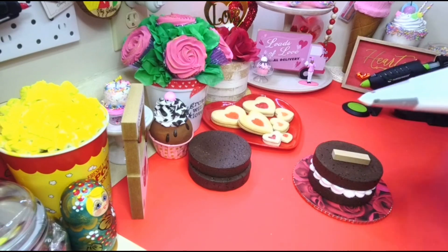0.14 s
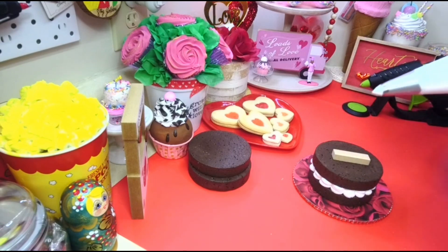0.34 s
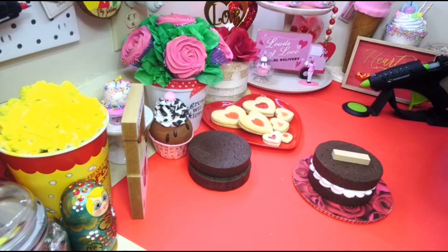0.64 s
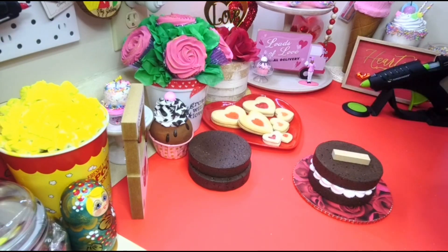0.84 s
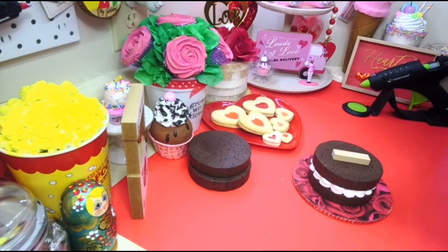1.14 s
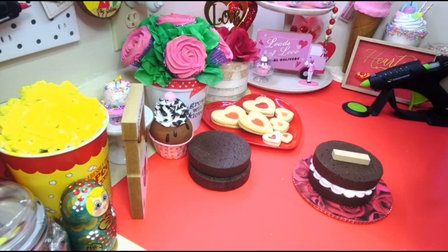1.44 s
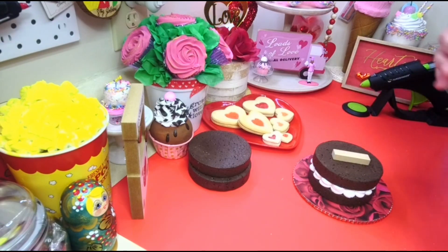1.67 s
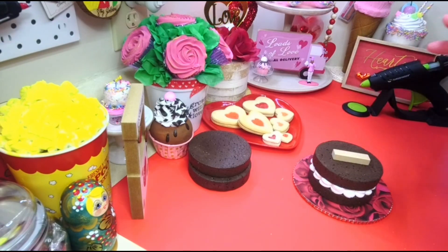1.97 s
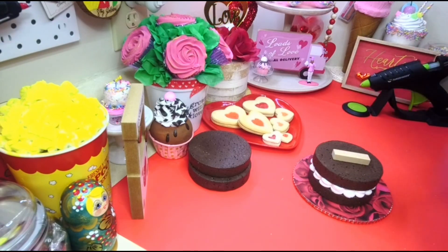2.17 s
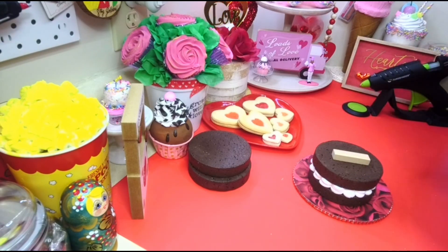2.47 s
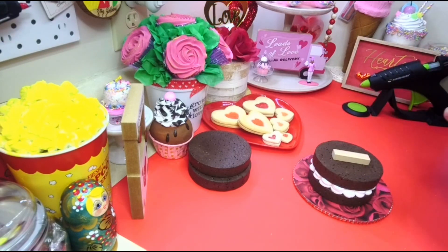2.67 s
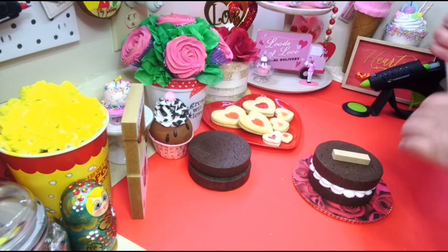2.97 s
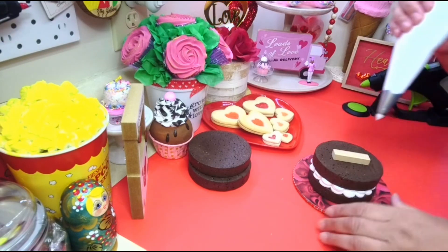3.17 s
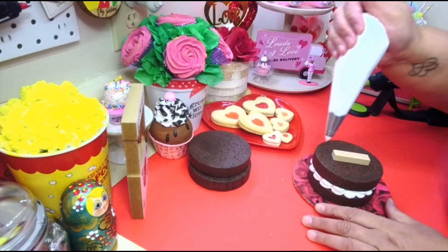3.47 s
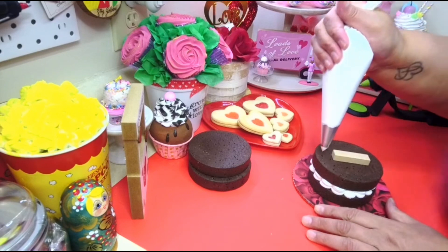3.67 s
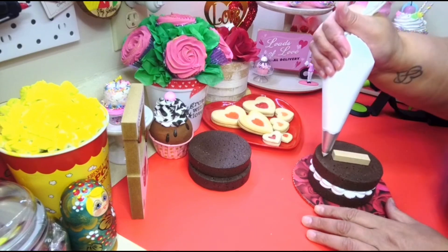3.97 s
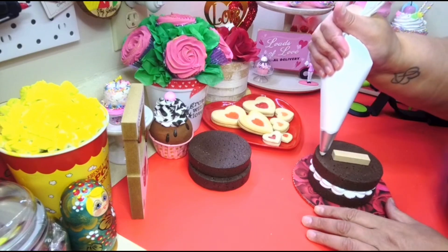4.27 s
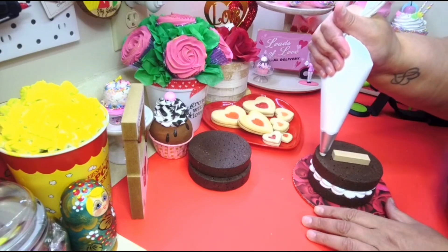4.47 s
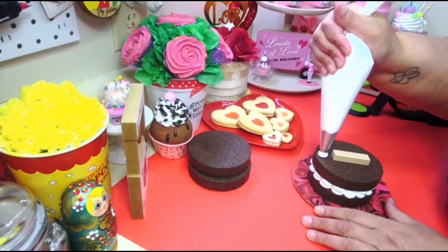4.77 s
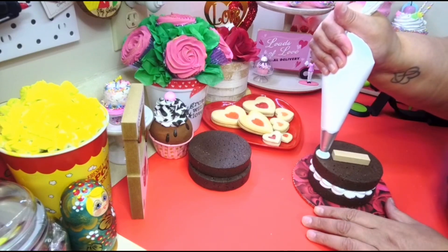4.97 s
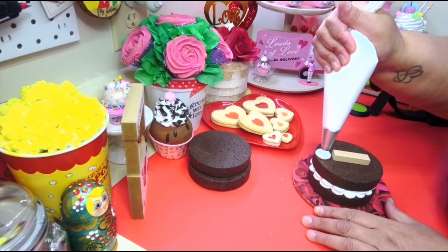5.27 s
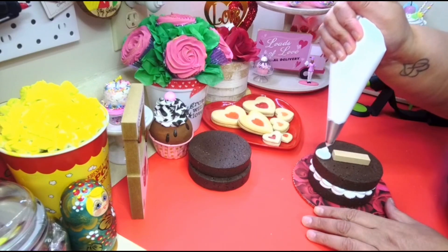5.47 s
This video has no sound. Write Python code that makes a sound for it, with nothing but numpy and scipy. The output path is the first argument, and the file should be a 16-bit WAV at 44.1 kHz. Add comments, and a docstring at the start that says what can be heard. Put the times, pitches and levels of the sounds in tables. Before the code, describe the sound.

A stiff plastic piping bag is handled at a craft table in a small room, close to a stereo camera microphone. Light rustle and small snaps come first, then a loud, bright burst of crackling before one second, thinning to separate pops. After three seconds a hand lands softly with a dull low thump, and only isolated tiny clicks remain over faint room murmur and hiss.

```python
"""On a craft table, to the right of a camera's stereo microphones, a plastic piping bag is gripped and turned.
A murmur of house and hiss runs throughout; from the start, filtered noise rustles and dense slip bursts crackle.
Soon creases snap singly, each a short resonant burst, and a low sine hums briefly; a small room answers the bag.
After three seconds only lone creases pop, and a hand lands softly, ringing decaying sines of the table top."""
import sys
import numpy as np
from scipy import signal
from scipy.fft import rfft, irfft, next_fast_len
from scipy.io import wavfile
from scipy.ndimage import uniform_filter1d

SR = 44100
rng = np.random.default_rng(int(sys.argv[2]) if len(sys.argv) > 2 else 0)


def decibels_to_gain(level_db):
    """Convert a level in decibels to a linear amplitude gain (20 dB per decade)."""
    exponent = np.asarray(level_db, float) / 20
    return 10 ** exponent


def dump(signal):
    """Clip the signal to [-1, 1] and save it as 16-bit WAV at the path in sys.argv[1]."""
    limited = np.clip(np.atleast_2d(signal).T, -1, 1)
    pcm = np.round(limited * 32767).astype(np.int16)
    wavfile.write(sys.argv[1], SR, pcm)


N = 247842  # length in samples


def unit(x):
    """Scaled to rms 1."""
    return x / np.sqrt(np.mean(x ** 2) + 1e-20)


def along(points, hz):
    """(Hz, value) points read on a log frequency axis."""
    f, v = np.transpose(points)
    return np.interp(np.log(hz + 1), np.log(f + 1), v)


def filtered(x, response):
    """x times a response of frequency."""
    m = next_fast_len(N + 8192)
    return irfft(rfft(x, m) * response(np.fft.rfftfreq(m, 1 / SR)), m)[..., :N]


def sides(pan_db):
    """Left and right gains for a left-over-right level difference."""
    return decibels_to_gain(np.array([pan_db / 2, -pan_db / 2]))


def laid(start_s, rows):
    """Short sounds summed at their start times."""
    at = np.round(start_s * SR).astype(int)[:, None] + np.arange(rows.shape[1])
    return np.bincount(at.ravel(), rows.ravel(), N + SR)[:N]


# Spectrum of the air at the microphones. Each row: frequency in Hz, relative density in dB.
AIR = [(15, -39.5), (25, -17.5), (103, -3.5), (150, -15.5), (214, -13), (422, -16.5), (584, -17),
       (854, -20.5), (927, -22.5), (1470, -19.5), (5570, -32), (8140, -34), (11900, -37.5), (15200, -35),
       (16500, -53.5)]
# How alike the two microphones hear that air. Each row: frequency in Hz, left-right likeness (1 = same).
AIR_ALIKE = [(60, 1), (130, 1), (290, 0.83), (640, 0.917), (1410, 0.07), (3100, 0.74), (6820, 0.73),
             (15000, 1)]
AIR_DB = -68  # rms


def room_tone():
    """Steady murmur of the house and microphone hiss, as noise whose likeness sets its mid/side balance."""
    def mid_and_side(hz):
        turn = np.arccos(np.clip(along(AIR_ALIKE, hz), -1, 1)) / 2
        return decibels_to_gain(along(AIR, hz)) * [np.cos(turn), np.sin(turn)]

    mid, side = filtered(rng.standard_normal((2, N)), mid_and_side)
    return decibels_to_gain(AIR_DB) * unit(np.array([mid + side, mid - side]))


# Squeezes of the bag. Each row: start in seconds, length in seconds, film level in dB at the start
# (before panning), change in dB to the end, share of smooth rustle from 0 to 1.
SQUEEZES = [(.0, 0.19, -68, 3, .9), (0.224, 0.05, -54, -6, 0.45), (0.318, .09, -60.5, 16, 0.34),
            (0.433, 0.075, -57.5, -6, .5), (0.528, 0.032, -51, 0.5, 0.02), (0.577, 0.054, -67, -6.5, 0),
            (0.719, 0.065, -23, -8, 0.35), (0.805, 0.18, -28.5, -3, 0.02), (1.002, .2, -33.5, -8.5, 0),
            (1.234, 0.0077, -30, -14, 0), (1.29, 0.012, -36, 2, 0), (1.345, 0.018, -43.5, 4.5, 0),
            (1.505, 0.11, -40.5, 9.5, 0.36), (1.685, 0.0063, -43, -5.5, 0.95), (1.733, 0.15, -55, 6.5, 1),
            (1.899, 0.076, -53, 5.5, 1), (1.998, 0.26, -46, -3, 0.5), (2.283, .14, -59, 4.5, 1),
            (2.418, 0.095, -56.5, -4, 1), (2.538, 0.21, -58, 2, 1), (2.685, 0.067, -53, -9, 0),
            (2.789, 0.087, -56.5, 0, 0.05), (2.88, 0.15, -69, -7, 0.5)]
RISE_S, FALL_S = 0.035, 0.051  # time to gain or lose 60 dB: the hand tightens fast, lets go more slowly


def grip():
    """Each squeeze rises, drifts and falls away; the strongest one at any moment leads."""
    start, length, db, change_db, share = np.transpose(SQUEEZES)[:, :, None]
    since = np.arange(N) / SR - start
    drift_db = change_db * np.clip(since / length, 0, 1)
    rise_db = 60 * np.minimum(since, 0) / RISE_S
    fall_db = -60 * np.maximum(since - length, 0) / FALL_S
    level_db = db + drift_db + rise_db + fall_db
    leader = level_db.argmax(0)
    return level_db.max(0), np.clip(share[leader, 0], 0, 1)


def buckles(centre_hz, t60, sharp, peak_db, strike, size):
    """Each buckle is a spiky burst of slips that dies fast, coloured by a broad resonance of its patch; peak 1."""
    t = np.arange(size) / SR
    hz = np.fft.rfftfreq(2 * size, 1 / SR)
    centre = centre_hz[:, None]
    slips = rng.standard_normal((len(centre), size))
    spiky = slips * np.abs(slips) ** sharp
    onset = 1 - np.exp(-t / 0.000077)
    decay = decibels_to_gain(-60 * t / np.clip(t60, .002, .08)[:, None]) + strike * decibels_to_gain(-60 * t / 0.01)
    tones = rfft(spiky * onset * decay, 2 * size)
    # slips excite all pitches alike
    power = uniform_filter1d(np.abs(tones) ** 2, size=size // 16 + 1)
    even = tones / np.sqrt(np.abs(power) + 1e-12)
    damping = .5j * hz * centre
    patch = 1 + decibels_to_gain(peak_db) * damping / (centre ** 2 - hz ** 2 + damping)
    burst = irfft(even * patch)[:, :size]
    return burst / np.abs(burst).max(1, keepdims=True)


HELD_S = 3.0  # small buckles are scattered from the start to here


def crackle(spectrum, smooth, centre_hz, spread_db, wide, count):
    """Many small buckles of very uneven size and colour, and plain noise; two-sided, rms 1 where they sound."""
    when, size, place, colour = rng.random((count, 4)).T
    hz = centre_hz * np.exp(1.1 * (colour - .5))
    rows = buckles(hz, 0.024 + 0.072 * size, sharp=0.067, peak_db=13.5, strike=3.6, size=256)
    rows = rows * decibels_to_gain(-spread_db * np.log(1 - .97 * size))[:, None]
    gains = sides(wide * (place - .5) * 20)
    grains = np.array([laid(when * HELD_S, rows * side[:, None]) for side in gains])
    grains = filtered(grains, lambda hz: decibels_to_gain(along(spectrum, hz)))
    grains = unit(grains) * np.sqrt(HELD_S * SR / N)
    near, apart = filtered(rng.standard_normal((2, N)), lambda hz: decibels_to_gain(along(smooth, hz)))
    noise = unit(np.array([near + wide * apart, near - wide * apart]))
    return grains, noise


# Spectrum of the crisp film's crackle. Each row: frequency in Hz, relative density in dB.
FILM = [(1470, -38.5), (2500, -9), (4740, -3.5), (6920, -7.5), (8640, -0.5), (13700, -2), (15700, -2.5),
        (16500, -16)]
# Spectrum of fingers sliding on the film. Each row: frequency in Hz, relative density in dB.
SLIDE = [(2470, -37.5), (4200, -3.5), (4680, -6.5), (8210, 0.5), (14900, 0), (15900, -3.5), (16500, -13.5)]
# Spectrum of the bag's larger panels. Each row: frequency in Hz, relative density in dB.
BELLY = [(150, -48.5), (250, -23.5), (530, -12.5), (730, -12), (920, -4), (1210, -17.5), (1480, -12.5),
         (2250, -6.5), (3500, -4), (4550, -18.5), (7700, -120)]
# panels under the film at a firm squeeze; dB gained on the film per dB of squeeze; film dB of a firm squeeze
BELLY_UNDER_DB, BELLY_GROWS, FIRM_DB = 14, 0.09, -44.5
BAG_PAN_DB = -2  # left over right


def handling():
    """Squeezing crackles film and panels; sliding fingers turn the crackle into a smooth rustle."""
    film_db, share = grip()
    belly_db = film_db - BELLY_UNDER_DB + BELLY_GROWS * (film_db - FIRM_DB)
    film = crackle(FILM, SLIDE, 7300.0, spread_db=5.5, wide=0.2, count=3500)
    belly = crackle(BELLY, BELLY, 2600.0, spread_db=5.5, wide=0.082, count=2000)
    out = 0
    for db, (grains, noise) in ((film_db, film), (belly_db, belly)):
        out = out + decibels_to_gain(db) * (np.sqrt(1 - share) * grains + np.sqrt(share) * noise)
    return out * sides(BAG_PAN_DB)[:, None]


EDGES = signal.butter(2, [3000, 14500], "bandpass", fs=SR, output="sos")  # thin film radiates no bass
PANELS = signal.butter(2, [1200, 3200], "bandpass", fs=SR, output="sos")
CORNERS = signal.butter(3, [10500, 15200], "bandpass", fs=SR, output="sos")
# corners over the film's peak; higher creases sizzle more
SIZZLE_DB, SIZZLE_DB_PER_OCTAVE, USUAL_HZ = -18.5, 8, 8360
# Creases that buckle. Each row: start in seconds, peak of the bright part in dB (before panning),
# centre in Hz, larger panels in dB over that peak, left over right in dB.
SNAPS = [(0.2257, -66.5, 9600, 11, 11), (0.2578, -42.5, 10700, -23, 3), (0.3526, -38.5, 8220, -14, -1.5),
         (0.383, -32, 5500, -29, -5), (0.399, -28, 8540, -21, -1), (0.5263, -30, 8200, -23.5, -2),
         (0.5467, -34.5, 7600, -15.5, 3), (0.615, -53, 7400, -15.5, 6), (0.6994, -23.5, 11400, -19.5, 12),
         (0.7063, -12.5, 4270, -23, -6.5), (0.7192, -15, 10600, -25, -10), (0.7293, -8, 10100, -18, -7.5),
         (0.7352, -9.5, 4560, -24.5, -5.5), (0.7442, -16, 8780, -14, 11), (0.7726, -14.5, 10100, -27, 0),
         (0.789, -13, 11400, -26.5, -6), (0.814, -17, 8350, -33.5, -10), (0.8254, -9.5, 7800, -24, 4),
         (0.8654, -5.5, 8950, -23, -8), (0.8756, -7.5, 8970, -20.5, 2), (0.8957, -10, 10800, -26.5, -9.5),
         (0.9062, -8.5, 9050, -22, 1.5), (0.9244, -14.5, 9800, -21, -9), (0.9384, -23.5, 8550, -22, -5),
         (0.9546, -14, 11100, -20, -4), (0.9716, -24.5, 8200, -27.5, -16), (1.0146, -16.5, 10800, -55, -12),
         (1.036, -17, 10300, -27, 4.5), (1.1622, -18, 7700, -25.5, 2), (1.1744, -19.5, 7400, -70, -9),
         (1.204, -24.5, 9150, -44, 1), (1.2366, -10, 7000, -50.5, -1.5), (1.2575, -20, 4650, -55, -8.5),
         (1.286, -25.5, 10000, -27, -11), (1.2972, -15, 10800, -63, -7.5), (1.3346, -20.5, 9500, -52, -9),
         (1.3546, -32.5, 10200, -18.5, 11), (1.3806, -23, 9070, -34, -7.5), (1.429, -38, 10700, -22, -3),
         (1.4653, -23, 10200, -31, -5), (1.5105, -25.5, 7350, -40, -9), (1.5419, -16, 10100, -30, 3),
         (1.5874, -18, 10900, -28, -3), (1.6414, -28, 7880, -32, 6), (1.6734, -22.5, 9400, -23, -2.5),
         (1.726, -34, 8300, -11, 1), (1.7469, -26.5, 11800, -38, 0.0), (1.7676, -30.5, 8700, -29, 0.0),
         (1.783, -29, 9600, -37, 2), (1.9195, -26, 10270, -31, -6), (1.9334, -31, 9300, -30, -2.5),
         (2.014, -26.5, 8400, -39, -5), (2.0358, -31, 8900, -36, -6), (2.0484, -27.5, 7470, -34, -1),
         (2.094, -29.5, 5150, -32, -7), (2.1231, -22, 10300, -23.5, -5), (2.153, -27, 3960, -34, -6),
         (2.1975, -40, 4280, -27, -15), (2.2334, -27, 9100, -33, 0), (2.5338, -30, 9400, -27, 1.5),
         (2.678, -28.5, 9600, -20, -4), (2.7026, -31, 9200, -19.5, -3), (2.7701, -26, 8500, -32, -5),
         (2.804, -31.5, 9400, -30, 7), (2.83, -26, 9300, -55, 4), (2.8364, -29.5, 9860, -17, -4),
         (3.2354, -25.5, 10600, -19.5, 3), (3.253, -43, 6850, -31, -0.5), (3.2653, -26.5, 12300, -49, -4),
         (3.3687, -32.5, 4170, -19, -3.5), (3.4607, -48.5, 5870, -5, -0.5), (3.48, -33.5, 6640, -47, -3.5),
         (3.5084, -21, 11100, -63, -4), (3.5925, -50, 7810, -24, 0.0), (3.6107, -49, 6020, -30, -5),
         (3.698, -39.5, 6040, -21, -5), (3.7206, -48.5, 6000, -2, 0), (3.7597, -17.5, 6590, -30, -5),
         (3.828, -38.5, 8700, -29, -6), (3.8781, -45, 8340, -22.5, -6), (3.9831, -53, 4620, -28, -6),
         (4.0489, -46, 6830, -41, -1.5), (4.0963, -46, 8070, -11.5, -4), (4.2093, -58, 8230, -19.5, 3),
         (4.2882, -39.5, 8340, -33, 3), (4.3246, -50.5, 10200, -26, -6), (4.4278, -51.5, 8040, -20.5, -7),
         (4.6657, -29, 6300, -25.5, -5.5), (4.6952, -27, 6920, -31, -5.5), (5.0521, -43.5, 8780, -27, 3),
         (5.2211, -53, 7960, -19, 1)]


def snaps():
    """Single creases: the buckle, a duller part from the larger panels and a sizzle from tight corners."""
    start_s, db, hz, panels_db, pan_db = np.transpose(SNAPS)
    corners_db = SIZZLE_DB + SIZZLE_DB_PER_OCTAVE * np.log2(hz / USUAL_HZ)
    burst = buckles(hz, np.full(len(hz), .024), sharp=1.0, peak_db=9.5, strike=0.79, size=2048)

    def part(band):
        heard = signal.sosfilt(band, burst)
        return heard / np.abs(heard).max(1, keepdims=True)

    dull = decibels_to_gain(panels_db)[:, None] * part(PANELS)
    sizzle = decibels_to_gain(corners_db)[:, None] * part(CORNERS)
    rows = decibels_to_gain(db)[:, None] * (part(EDGES) + dull + sizzle)
    return np.array([laid(start_s, rows * side[:, None]) for side in sides(pan_db)])


# The low hum. Each row: start in seconds, length in seconds, frequency in Hz, rms level in dB.
HUM = [(.635, 0.52, 127.6, -65)]
HUM_FADE_S = .07


def hum():
    """A pure low tone that comes and goes."""
    start, length, hz, db = HUM[0]
    t = np.arange(N) / SR - start
    fade = np.clip(np.minimum(t, length - t) / HUM_FADE_S, 0, 1)
    return fade * np.sqrt(2) * decibels_to_gain(db) * np.sin(2 * np.pi * hz * t)


# Heel and fingers landing on the table. Each row: start in seconds, strength in dB.
HAND = [(3.232, -54), (3.31, -62)]
# Modes of the table top. Each row: frequency in Hz, level in dB over the strength, 60 dB decay in seconds.
TABLE = [(65.1, 8, 0.25), (131, 8.5, 0.16), (92.6, -3, 0.32)]


def hand():
    """A soft palm sets the table's lowest modes going."""
    start_s, db = np.transpose(HAND)
    t = np.arange(SR // 2) / SR
    ring = sum(decibels_to_gain(level - 60 * t / t60) * np.sin(2 * np.pi * hz * t) for hz, level, t60 in TABLE)
    soft_onset = 1 - np.exp(-t / 0.012)
    return laid(start_s, decibels_to_gain(db)[:, None] * ring * soft_onset)


# Decay of the small room. Each row: frequency in Hz, 60 dB decay in seconds.
ROOM = [(500, 0.55), (2500, 0.19), (5000, .17), (9000, 0.15), (15000, 0.12)]


def room(x):
    """Near objects and walls answer; a fresh noise tail for each short stretch, as the bag keeps moving."""
    out, step, size, delay = np.zeros((2, N + SR)), 4096, 12288, 90  # samples
    for start in range(0, N, step):
        hz, t, z = signal.stft(rng.standard_normal((2, size)), SR, nperseg=256)
        decay = decibels_to_gain(-60 * t / along(ROOM, hz)[:, None])
        tail = signal.istft(z * decay, SR, nperseg=256)[1]
        tail = tail + 4.2 * tail[0]  # both microphones hear much the same walls
        wet = signal.fftconvolve(x[:, start:start + step], tail / np.linalg.norm(tail[0]), axes=1)
        out[:, start + delay:start + delay + wet.shape[1]] += wet
    return out[:, :N]


def scene():
    """Bag, hand, hum and room tone; the room answers the bag."""
    pops, rustle = snaps(), handling()
    answer = room(decibels_to_gain(-8.5) * pops + decibels_to_gain(-3.5) * rustle)
    return pops + rustle + answer + hand() + hum() + room_tone()


# The camera's treble roll-off. Each row: frequency in Hz, gain in dB.
TREBLE = [(15500, 0), (15900, -23), (16800, -31)]


def camera_treble(x):
    """The camera passes little above 16 kHz."""
    return filtered(x, lambda hz: decibels_to_gain(along(TREBLE, hz)))


def top_cut(x):
    """Nothing passes above the cut-off."""
    return signal.sosfilt(signal.butter(12, 16840, fs=SR, output="sos"), x)


def record(dry):
    """The scene as the camera takes it down, its treble rolled off."""
    mix = camera_treble(dry)
    return top_cut(mix)


dry = scene()
out = record(dry)
dump(out)
```